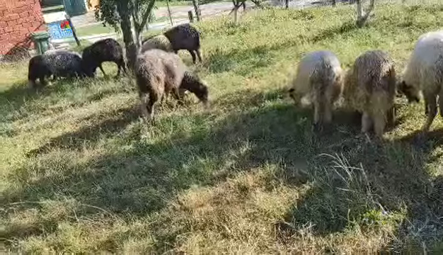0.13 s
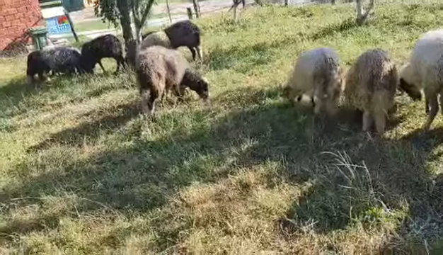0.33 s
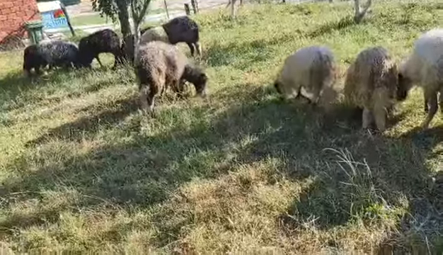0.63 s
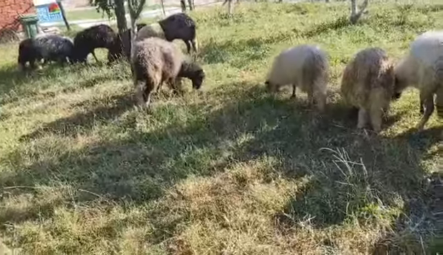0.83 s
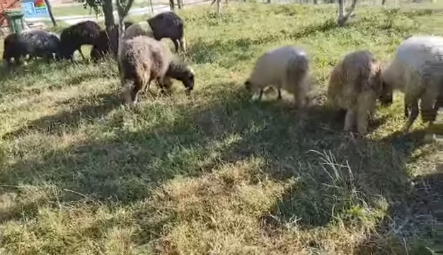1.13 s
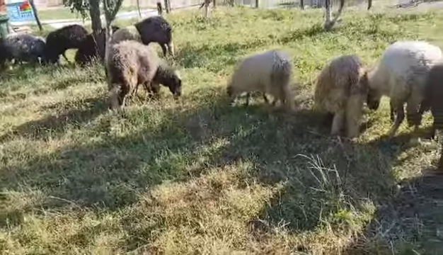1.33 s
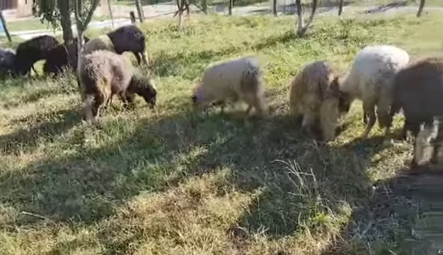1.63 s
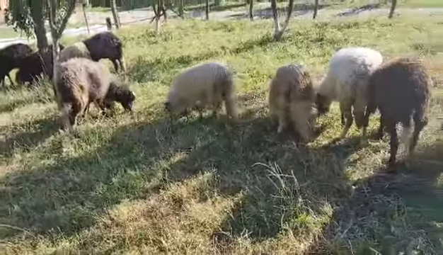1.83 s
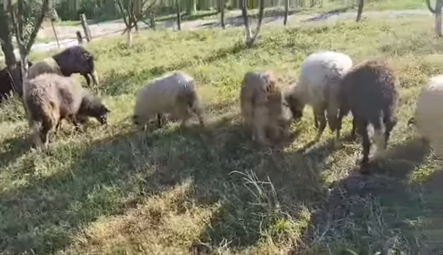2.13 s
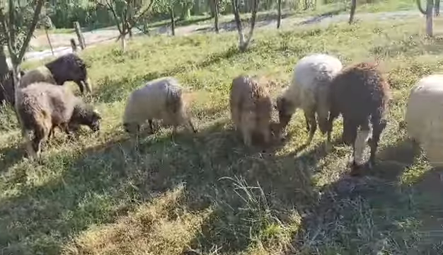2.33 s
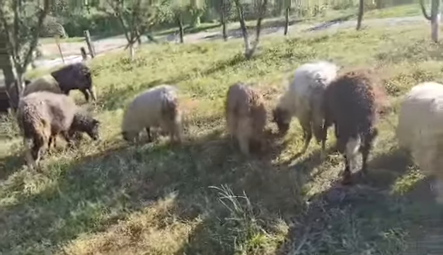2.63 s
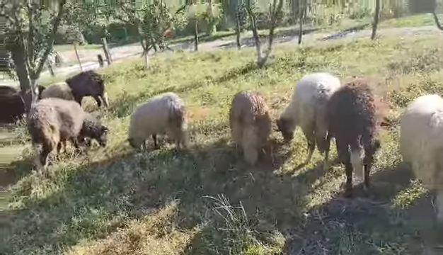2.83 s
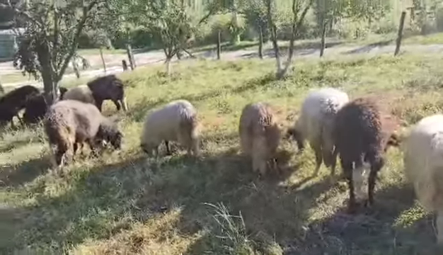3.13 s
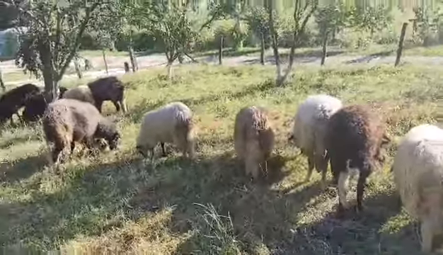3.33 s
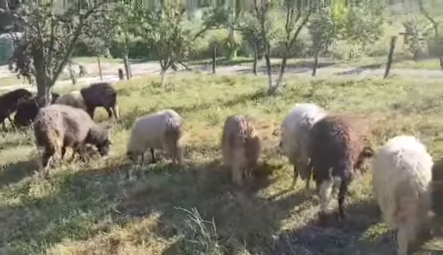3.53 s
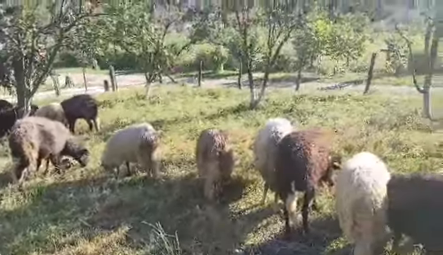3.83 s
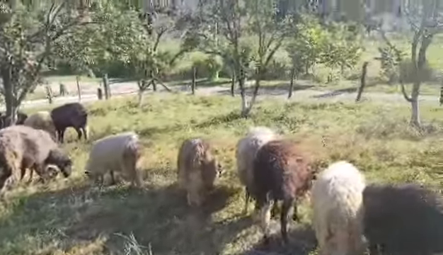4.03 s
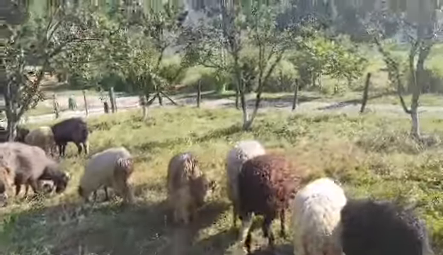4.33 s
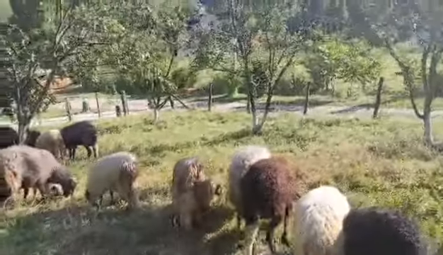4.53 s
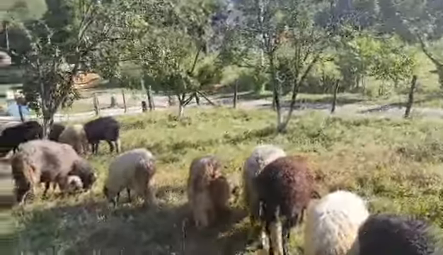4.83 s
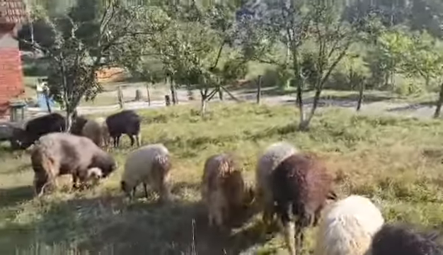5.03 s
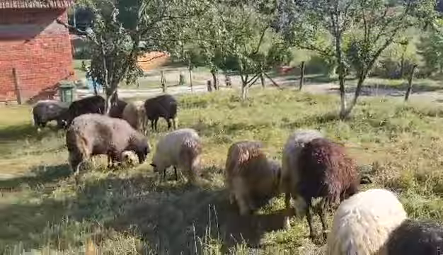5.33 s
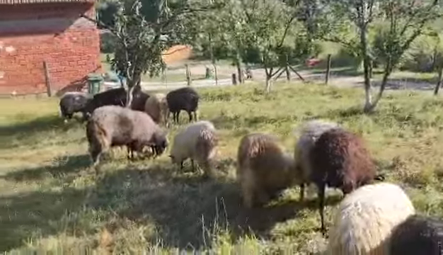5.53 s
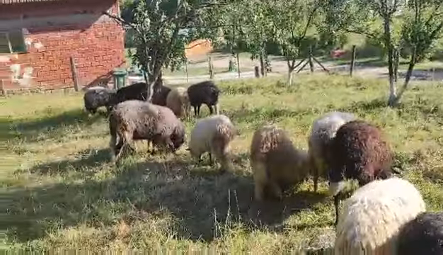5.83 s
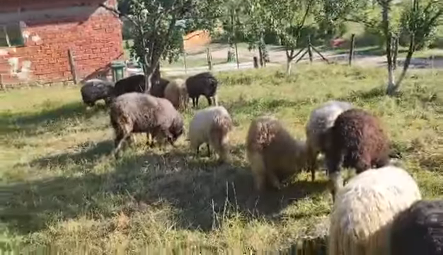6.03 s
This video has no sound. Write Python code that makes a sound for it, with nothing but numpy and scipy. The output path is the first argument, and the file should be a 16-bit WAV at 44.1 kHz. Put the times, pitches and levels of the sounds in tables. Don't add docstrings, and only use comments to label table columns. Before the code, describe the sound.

Grazing sheep crop grass with crackling rustle as one dull, clanky neck bell jolts unevenly outdoors and gusts buffet the left channel.

```python
import sys
import numpy as np
from scipy import signal
from scipy.fft import rfft, irfft
from scipy.io import wavfile
from scipy.ndimage import uniform_filter1d, minimum_filter1d

SR = 44100
rng = np.random.default_rng(int(sys.argv[2]) if len(sys.argv) > 2 else 0)


def natural_amplitude(level_db):
    exponent = np.asarray(level_db, float) / 20
    return 10 ** exponent


def put_to_file(sound):
    columns = np.atleast_2d(sound).T
    safe = np.clip(columns, -1, 1)
    whole_steps = np.round(safe * 32767)
    wavfile.write(sys.argv[1], SR, whole_steps.astype(np.int16))


N = 272008
TIME = np.arange(N) / SR

# start_s, level_db
GRAZING = [(0.3, -55.5), (1.34, -54.5), (1.53, -53.5), (1.98, -55.5), (2.21, -54.5), (2.8, -49),
           (3.03, -56.5), (3.31, -54.5), (3.52, -47), (3.85, -53.5), (4.14, -46.5), (4.27, -48),
           (5.25, -47), (5.63, -46), (6.17, -54.5)]
# centre_s, half_length_s, level_db
TEARS = [(3.3, 0.018, 3.5), (1.851, 0.024, 9), (4.9, 0.02, 6), (4.5, 0.042, 4.5), (2.8, 0.019, 6),
         (6.6, 0.11, 3), (3.4, 0.058, 7.5), (5.4, 0.058, 2.5), (7, 0.07, 3), (2.3, .08, -3),
         (2.7, 0.057, 3), (5.6, 0.023, 2.5), (0.88, 0.05, 4), (5.46, 0.013, -2.5)]
# start_s, peak_db, bright_part_db
SNAPS = [(0.178, -49, -59), (0.76, -45, -63), (0.975, -37.5, -53), (1.0767, -37, -52), (1.088, -57, -38.5),
         (1.0964, -42, -43), (1.1012, -43, -36), (1.1027, -41.5, -43), (1.2066, -43.5, -57),
         (1.229, -55, -37), (1.5539, -60, -59), (1.8765, -45.5, -33.5), (2.1721, -55, -36),
         (2.4151, -68, -52), (0.6835, -55, -57), (5.2766, -44, -52), (5.478, -53, -28.5), (5.36, -39, -55),
         (3.429, -34, -59), (4.892, -50, -28), (5.979, -50, -34.5), (2.7397, -39.5, -48),
         (2.8257, -38, -56), (2.858, -44, -58), (3.017, -41.5, -41), (3.4976, -49, -29), (3.5102, -32, -24),
         (3.524, -25.5, -28.5), (3.532, -30, -56), (3.5443, -28, -47), (3.5509, -37, -63),
         (5.196, -36.5, -36), (5.2438, -52, -36), (5.4625, -58, -30.5), (5.6778, -36.5, -30.5)]
# pitch_hz, level_db
LEFT_DULL = [(60, -6.5), (250, 0), (700, -2), (1100, -2.5), (2200, 0.5), (3200, -3), (4500, -5), (5600, -8),
             (7000, -21)]
RIGHT_DULL = [(60, -8.5), (200, -1), (600, -6), (1000, -2.5), (2200, -7.5), (3500, -4), (4800, -10),
              (7000, -2)]
LEFT_BRIGHT = [(4500, -18.5), (6000, -11), (7200, -12.5), (8300, 2), (9500, -4), (10500, -13), (12500, -13),
               (13300, -20.5)]
RIGHT_BRIGHT = [(3800, -13.5), (5000, -7.5), (6200, -11), (7500, 1.5), (8600, -9), (9500, -13),
                (10500, -15), (12800, -14.5), (13300, -47)]

MODE_HZ = [1019, 1130, 2637, 2865, 5179, 7461, 7792, 8984, 9334, 9812, 4912, 10304, 10753]
# level_db, t60_s, rise_ms, left_minus_right_db, left_lead_rad
MODES = [(8, 0.084, 3, 6, 0.46), (0, 0.91, 0.77, 7.5, 0.6), (2.5, 1.04, 2.1, 1, -0.56),
         (5, 0.8, 9.5, 4, -0.5), (3, 0.4, 0.2, -0.5, 3), (2.5, 0.28, 0.2, -3.5, 3),
         (7, 0.29, 0.048, -5.5, -0.5), (1, 0.2, 0.85, 18.5, 5.5), (0.5, 0.25, 0.34, 6, 0.9),
         (3.5, 0.15, 0.21, 10, 6.5), (4.5, 0.41, 0.26, 3, -1.2), (17.5, 0.15, 0.39, 12, -1),
         (9, 0.11, 0.37, 24, -1)]
# readiness_db, crest_round_deg, crest_up_deg
SHAPES = [(-2, 30, 39.5), (-8, 2, 2), (-10, 77, 6), (-17, 92, 144.5), (-14, 93.5, 66), (-8, 28.5, 145.5),
          (-11, 94, -15), (-6, 136, 43), (-12, 114, 59), (-15, 174, 124), (-17, 129.5, -12.5),
          (-30, 95, 114), (-25.5, 91, 54)]
WAVES_ROUND = [3, 0, 1, 3, 3, 2, 2, 4, 1, 1, 4, 3, 4]
WAVES_UP = [4, 0, 2, 4, 3, 2, 0, 1, 4, 4, 1, 4, 2]
TWIN = [0, 0, 1, -1, -1, 1, -1, 1, -1, 1, 1, -1, 1]
WAIST = [0, 0, 0, 0, 1, 0, 0, 0, 0, 0, 1, 0, 0]
# left_minus_right_facing_away_db, change_per_head_turn_db
BEAMS = [(-0.5, 1), (1, 1), (11, -2.5), (6.5, -1.5), (-2.5, -1.5), (-3.5, -6.5), (2.5, -8.5), (3, -42),
         (2.5, 5), (8, 1), (1, 3.5), (-12, 2), (13, 4)]
# start_s, turn (+ to one side)
HEAD_TURNS = [(0.07, 0.026), (0.39, -1.1), (0.83, 0.16), (2.02, 0.51), (2.3, 0.25), (3.33, 1.2),
              (3.8, -0.72), (4.4, -1.4), (4.9, 2), (5.5, -0.82), (5.8, 0.32), (6.03, -0.79)]
# start_s, lead_ms
BEARING = [(.3, 0.34), (.9, 0.45), (1.3, 0.48), (1.7, 0.31), (2.05, 0.2), (2.5, .15), (3.35, 0.19),
           (3.7, 0.12), (4.15, 0.041), (4.6, 0.063), (5.5, 0.12), (6.05, .18)]
# start_s, strength_db, round_rim_deg, up_wall_deg, hum_left_by_wool_db
BLOWS = [(0.0723, -35.5, 97, 150, 4), (0.3811, -20.5, 52, 132, -24), (0.8079, -31, 42, 29, -9),
         (1.2584, -29.5, 90.7, 16.5, -16), (1.5726, -30.5, 107, 16, -36), (1.7122, -33, 142, 85.6, -29),
         (1.94, -23, 171, 41.4, -39), (2.0169, -19, 96, 8.2, -20), (2.4676, -27, 94, 81, -3.5),
         (3.3256, -27.5, 91.5, 140.5, -5), (3.4132, -23.5, 93, 147, -28), (3.6283, -22.5, 148, 40.6, -15),
         (3.809, -28, 65, 40.8, -19), (4.117, -23.5, 2.2, 46, -18), (4.216, -23.5, 7.1, 168.0, -4.5),
         (4.3322, -23.5, 26, 65.2, -9), (4.5875, -30, 114.3, 140.0, -65), (4.8269, -23, 2.4, 90, -39),
         (5.1732, -29, 86, 55.6, -15), (5.491, -18, 7, 112, -13), (5.795, -16.5, 9.5, 20.0, -2.5),
         (6.0292, -15, 4.6, 126.3, -13.5)]
REBOUNDS = [(0.1217, -30.5, 174, 37, -5.5), (0.402, -30.5, 75, 176.0, -5), (0.829, -27.5, 30, 176.0, -27),
            (0.863, -28, 131, 84, -17), (2.089, -27, 18.7, 43.7, -15), (2.536, -30.5, 90, 108, -5.5),
            (3.481, -25, 12, 40.6, -17), (4.7, -40.5, 28, 370, 0), (5.507, -25.5, 71, 65, -31.0),
            (2.027, -22.5, 95, 9.8, -19), (3.337, -28, 98, 140.5, -9), (3.49, -24, 20, 38.4, -17),
            (3.822, -33, 51, 37, -23.5), (3.832, -29, 65.4, 39.2, -18), (4.352, -25, 7.1, 165, -7),
            (5.8064, -19.5, 16, 31, -6), (5.498, -20.5, 7.3, 111, -8.5)]
# start_s, clank_peak_db, hardness_db_per_octave, lean_to_twin_db, waist_db
CLANKS = [(0.3767, -38.5, 3, -1.6, 2), (0.8057, -42, -1.7, -3.5, -1.5), (0.832, -44, -3, 0.3, -0.7),
          (1.256, -44, -3.5, 1.3, 0.8), (1.5703, -48, -0.5, 0.1, 1.5), (1.708, -64, -1.8, 2.5, -7),
          (1.9378, -40, 1.7, -0.9, -3.5), (2.0146, -31.5, -4.5, 2, -2), (2.0264, -53, 0.3, 1.3, -1),
          (2.089, -46, -0.2, 0.3, 2), (2.4658, -42, -2.2, 2.8, -4), (3.3219, -37.5, 2, -1.5, 4.2),
          (3.411, -53, 2, 1.5, 0.1), (3.478, -51, -0.4, -1.5, 0.1), (3.6244, -56, -4.5, 0, -5),
          (3.8064, -60, -7.7, 5, -4.5), (3.8304, -59, -1, -0.2, 1.3), (4.114, -44, -2.3, -0.2, 3.2),
          (4.215, -42, 1, -0.7, -1), (4.3286, -59, -1.2, -1, -3), (4.5845, -68, 3, 1.2, -4),
          (4.8229, -43, -1.3, 2.5, 5), (5.1722, -42, 0.5, 0.8, -2), (5.4914, -49, 0.8, 0.3, 0.5),
          (5.7932, -45, 0.5, -2, -3), (5.806, -43, 0.3, 2.1, 3), (6.027, -35, 5.1, -2.2, -1.5)]
# start_s, peak_db, left_minus_right_db
SHEEN = [(0.1201, -59.5, 5), (0.393, -41, -1), (0.8134, -60, 3.5), (1.2564, -78, 0.0), (1.5744, -68, -2.0),
         (1.7074, -63, 0.5), (1.9375, -46, -11), (2.0153, -50.5, 30), (2.0742, -48, 14),
         (2.4638, -63, -2.5), (3.3354, -74, 4.0), (3.4114, -55, -3), (3.4807, -41, 4), (3.4945, -38, 9),
         (3.6247, -45, 13), (3.8067, -41, 5), (3.8307, -43, 10.5), (4.114, -49, 17), (4.2193, -41, -1),
         (4.3415, -49, 1.5), (4.8264, -54, -0.5), (4.8898, -60, 2.5), (5.4874, -43, 23), (5.5074, -49, 8),
         (5.8067, -29.5, 3), (6.027, -50, 24), (6.0494, -57, 1)]
# delay_s, and level_db
ECHO_S = (.044, .057, 0.074)
ECHO_DB = (-13.5, -26.5, -22.5)

# start_s, level_db
BREEZE = [(0.12, -69), (0.5, -60.5), (1.1, -83.5), (2.1, -75), (2.83, -40.5), (3.12, -58), (3.7, -50.5),
          (4.05, -34), (4.33, -41), (4.62, -62.5), (4.9, -63), (5.1, -36), (5.3, -32), (5.44, -60),
          (5.62, -38.5), (5.85, -60), (6.17, -69)]
# centre_s, half_length_s, level_db
GUSTS = [(0.466, 0.034, -58), (0.7, 0.084, -52), (1.344, 0.029, -50), (1.494, 0.022, -51.5),
         (2.28, 0.062, -49.5), (2.706, 0.05, -34), (2.918, 0.032, -30.5), (3.199, 0.016, -26.5),
         (3.326, 0.0092, -33), (3.79, 0.0093, -27), (3.862, 0.013, -27.5), (3.965, 0.016, -19.5),
         (4.192, 0.068, -30.5), (4.39, 0.058, -35.5), (4.539, 0.02, -36), (4.74, 0.017, -61),
         (3.016, 0.033, -46), (2.62, 0.03, -64), (0.925, 0.027, -54.5), (5.037, 0.052, -26.5),
         (5.17, 0.062, -33.5), (5.38, 0.028, -27.5), (5.518, 0.029, -28.5), (5.612, 0.0093, -23.5),
         (5.679, 0.059, -27.5), (5.916, 0.017, -38.5)]
# start_s, peak_db
PUFFS = [(0.179, -39), (2.695, -28.5), (2.901, -25.5), (3.181, -33), (3.319, -32.5), (3.784, -34.5),
         (3.958, -16.5), (4.18, -21), (4.349, -38), (4.996, -25), (5.15, -22), (5.178, -19.5), (5.346, -33),
         (5.376, -13.5), (5.485, -19.5), (5.595, -14.5), (5.7, -22)]
# level_at_reference_wind_db, share_of_swing, smoothing_s
EDDIES = [(-43.5, 0.61, 0.15), (-50.5, 1.104, 0.011), (-60, 1.046, .005)]
# pitch_hz, level_against_mean_treble_db
KEPT_ABOVE = [(500, -40), (1200, -16), (2700, -12), (3600, 1), (4400, 3), (5600, 0), (7600, -12),
              (9500, -10), (11000, -2)]


def rms_one(x):
    return x / np.sqrt(np.mean(x ** 2) + 1e-20)


def in_time(rows):
    s, *columns = np.transpose(rows)
    return [np.interp(TIME, s, c) for c in columns]


def bumps(rows):
    return [np.exp(-((TIME - s) / half) ** 2) for s, half, _ in rows]


def band(x, low_hz, high_hz, order=2):
    return signal.sosfilt(signal.butter(order, [low_hz, high_hz], "band", fs=SR, output="sos"), x)


def low_pass(order, cutoff_hz):
    return signal.butter(order, cutoff_hz, fs=SR, output="sos")


def die_away(x, seconds):
    return signal.lfilter([1], [1, -np.exp(-1 / (seconds * SR))], x)


def colour(x, points):
    hz = np.linspace(1, SR / 2, 1025)
    at, db = np.transpose(points)
    level_db = np.interp(np.log(hz), np.log(at), db, left=db[0] - 20.0, right=-80)
    cepstrum = irfft(np.log(natural_amplitude(level_db)))
    cepstrum[1:1024] *= 2
    cepstrum[1025:] = 0
    return signal.oaconvolve(x, irfft(np.exp(rfft(cepstrum)))[:512])[:N]


def ports(x, left, right):
    return np.array([colour(x[0], left), colour(x[1], right)])


def drift(rate):
    r = np.exp(-80 * np.pi * rate / SR)
    slow = signal.lfilter([1], [1, -2 * r, r * r], rng.standard_normal(N // 40 + 2002))[2000:]
    return np.interp(np.arange(N) / 40, np.arange(len(slow)), rms_one(slow))


def clicks(times, sizes):
    out = np.zeros(N)
    out[(np.asarray(times) * SR).astype(int)] = sizes
    return out


def crackle(per_s, size_db, hiss, shared):
    draw = rng.random((3, N)) * SR / (per_s * natural_amplitude(3.0 * drift(18.0)))
    noise = rng.standard_normal((3, N))
    sizes = np.clip(draw, .007, 1) ** (-size_db * np.log(10) / 20)
    breaks = np.where(draw < 1, np.sign(noise) * sizes, 0)
    grains = rms_one(breaks) + hiss * noise[::-1]
    left_lag = 8
    return grains[:2] + shared * np.array([np.roll(grains[2], left_lag), grains[2]])


def grass():
    dull_level_db, dull_follow, effort_ref_db = -59, 0.88, -51.5
    flicker_db, flicker_rate = 1.1, 14
    tear_db = sum(row[2] * bump for row, bump in zip(TEARS, bumps(TEARS)))
    effort_db, = in_time(GRAZING)
    bright_db = effort_db + tear_db
    dull_db = dull_level_db + dull_follow * (effort_db - effort_ref_db) + .6 * tear_db
    bright = rms_one(ports(crackle(2700.0, 3.2, 0.56, 0.35), LEFT_BRIGHT, RIGHT_BRIGHT))
    bright *= natural_amplitude(bright_db + 2.0 + flicker_db * drift(flicker_rate))
    dull = rms_one(ports(crackle(1200.0, 2.18, 0.31, 0.62), LEFT_DULL, RIGHT_DULL))
    dull *= natural_amplitude(dull_db + 9.0 + flicker_db * drift(flicker_rate))
    return bright + dull


def snaps_and_clanks():
    clank_db, clank_top_db, clank_early_s, snap_s = 3.5, -3.5, 0.00023, .002
    ticks = [(s - clank_early_s, db + clank_db, db + clank_top_db) for s, db, *_ in CLANKS]
    s, peak_db, top_db = np.transpose(list(SNAPS) + ticks)
    noise = rng.standard_normal((3, N))
    noise = noise[:2] * 1.51 + noise[2]
    low = die_away(clicks(s, natural_amplitude(peak_db + 3.0)), snap_s) * noise
    top = die_away(clicks(s, natural_amplitude(top_db + 6.0)), snap_s) * noise
    return band(low, 1300, 6250) + ports(top, LEFT_BRIGHT, RIGHT_BRIGHT)


def strikes():
    node_leak, hum_hz, hard_from_hz = .003, 1130, 4600
    carry_db = -9.5
    mode_hz, t60 = np.array(MODE_HZ), np.array(MODES)[:, 1]
    s, db, round_deg, up_deg, hum_db = np.array(sorted(list(BLOWS) + list(REBOUNDS))).T[:, :, None]
    ready_db, crest_round, crest_up = np.transpose(SHAPES)
    round_share = np.cos(np.radians(np.array(WAVES_ROUND) * round_deg - crest_round)) ** 2 + node_leak
    up_share = np.cos(np.radians(np.array(WAVES_UP) * up_deg - crest_up)) ** 2 + node_leak
    at, _, hardness, lean_db, waist_db = np.transpose(CLANKS)
    hard_db = np.interp(s, at, hardness) * np.log2(np.maximum(mode_hz / hard_from_hz, 1))
    hard_db += np.interp(s, at, lean_db) * np.array(TWIN)
    hard_db += np.interp(s, at, waist_db) * np.array(WAIST)
    blow_db = db + hard_db + ready_db + hum_db * (mode_hz == hum_hz)
    power = round_share * up_share * natural_amplitude(blow_db) ** 2
    for k in range(1, len(s)):
        power[k] += power[k - 1] * natural_amplitude(carry_db - 60 * (s[k] - s[k - 1]) / t60) ** 2
    return s[:, 0], 10 * np.log10(power)


def bell(early_s=0.001, flutter_db=3.0, burst=0.42, burst_s=0.01):
    times, levels_db = strikes()
    times = times - early_s
    head_turn = np.interp(times, *np.transpose(HEAD_TURNS))
    last = np.maximum(np.searchsorted(times, TIME) - 1, 0)
    age = TIME - times[last]
    swings = [natural_amplitude(flutter_db * drift(35.0)) for _ in range(4)]
    first = 1 + burst * np.exp(-age / burst_s)
    left_lead_s = in_time(BEARING)[0] / 1000
    out = np.zeros((2, N))
    for k, (db, t60, rise_ms, pan_db, lead) in enumerate(MODES):
        beam_db = pan_db + BEAMS[k][0] + BEAMS[k][1] * head_turn
        sides_db = np.minimum([beam_db, -beam_db], 0)
        start = natural_amplitude(levels_db[:, k] + db + sides_db)[:, last]
        fall = np.exp(-np.log(1000) * age / t60) * (age > 0)
        if k > 1:
            fall = fall * first * swings[k % 4]
        smooth = np.exp(-1000 / (rise_ms * SR))
        shape = signal.lfilter([1 - smooth], [1, -smooth], start * fall)
        phase = 2 * np.pi * MODE_HZ[k] * TIME
        left_phase = phase + lead + 2 * np.pi * MODE_HZ[k] * left_lead_s
        out += shape * np.sin([left_phase, phase])
    return out


def clack(jangle_db=-12.0, jangle_s=0.047, spark_db=-6.0, spark_s=0.0096, knock_db=0.5):
    times, levels_db = strikes()
    high_modes = np.array(MODE_HZ) > 7000
    hits = clicks(times - .002, natural_amplitude(np.max(levels_db[:, high_modes], axis=1)))
    noise = rng.standard_normal((2, N))
    jangle = natural_amplitude(jangle_db) * die_away(hits, jangle_s) * noise
    spark = natural_amplitude(spark_db) * die_away(hits, spark_s) * noise
    both = band(jangle, 6900, 11600) + natural_amplitude(knock_db) * band(spark, 2700, 6300)
    return both * natural_amplitude([[3.5], [-3.5]])


def wall(x):
    dull = signal.sosfilt(low_pass(2, 1960), x)
    return sum(natural_amplitude(db) * np.pad(dull, ((0, 0), (int(s * SR), 0)))[:, :N] for s, db in zip(ECHO_S, ECHO_DB))


def sheen(level_db=-3.5, t60_s=0.17, flash_s=0.0018, tail_db=-6.5):
    s, db, pan_db = np.transpose(SHEEN)
    hits = np.array([clicks(s, natural_amplitude(db + level_db + side * pan_db / 2)) for side in (1, -1)])
    tail = signal.lfilter([natural_amplitude(tail_db)], [1, -natural_amplitude(-60 / (t60_s * SR))], hits)
    flash = die_away(hits, flash_s)
    noise = rng.standard_normal((2, 2, N))
    clusters = natural_amplitude(-10.0) * band(noise[0], 11850, 12100)
    clusters += natural_amplitude(1.0) * band(noise[1], 12220, 12400)
    clusters += band(noise[0], 12740, 12920)
    return tail * rms_one(clusters) + flash * rms_one(band(noise[1], 11600, 13500, order=4))


def wind():
    wind_ref_db = -49.5
    port_top = 0.51
    edges_hz, leak_db = [(16, 56.6), (70, 194), (190, 295)], [-20.0, -27.0, -30.0]
    out = np.zeros((2, N))
    lumps = drift(27.5)
    force = natural_amplitude(in_time(BREEZE)[0])
    force = force + sum(natural_amplitude(row[2]) * bump for row, bump in zip(GUSTS, bumps(GUSTS)))
    force_db = 20 * np.log10(force) - wind_ref_db
    for (level_db, follow, smooth_s), (low_hz, high_hz), db in zip(EDDIES, edges_hz, leak_db):
        eddies = rms_one(band(rng.standard_normal((2, N)) * natural_amplitude(3.84 * lumps), low_hz, high_hz))
        swing_db = follow * uniform_filter1d(force_db, int(smooth_s * SR) + 1)
        out += eddies * natural_amplitude(level_db + swing_db + 5.5) * natural_amplitude([[0], [db]])
    s, peak_db = np.transpose(PUFFS)
    push = clicks(s, natural_amplitude(peak_db + 43.0) * rng.choice([-1, 1], len(s)))
    out[0] += band(push, 63, 440)
    squashed = port_top * np.tanh(out / port_top)
    return signal.sosfilt(low_pass(3, 400.0), squashed) * (TIME > BREEZE[0][0])


def lurch(start_s=0.2, rise_s=0.08, fall_s=0.17, level_db=-17.5):
    age = np.maximum(TIME - start_s, 0)
    swing = (1 - np.exp(-age / rise_s)) * np.exp(-age / fall_s)
    back = 0.22 * (1 - np.exp(-age / 0.23)) * np.exp(-age / 0.56)
    return (swing - back) * natural_amplitude(level_db) * natural_amplitude([[0], [-4.6]])


def scene():
    ringing = bell() + clack() + sheen()
    return grass() + snaps_and_clanks() + ringing + wall(ringing) + wind() + lurch()


def thin_out(x, size=2048):
    follow, ref_db, step_db, wind_cost_db = .6, -80.0, 5, -29
    window = np.sin(np.pi * (np.arange(size) + .5) / size)
    hz, _, bins = signal.stft(x, SR, window, size)
    level_db = 20 * np.log10(abs(bins) + 1e-12)
    treble = np.mean(abs(bins[:, (hz > 1000) & (hz < 13000)]) ** 2, axis=(0, 1))
    rumble = np.mean(abs(bins[0, (hz > 40) & (hz < 500)]) ** 2, axis=0)
    gusts = natural_amplitude(wind_cost_db) ** 2 * rumble
    mean_db = 10 * np.log10(treble + gusts + 1e-24)
    at, db = np.transpose(KEPT_ABOVE)
    line_db = np.interp(np.log(hz + 1), np.log(at), db)[:, None] + ref_db + follow * (mean_db - ref_db)
    steps = rng.standard_normal((1, size // 24 + 1, bins.shape[2]))
    steps = uniform_filter1d(steps, size=3, axis=2) * np.sqrt(3)
    patches = step_db * np.repeat(steps, 12, axis=1)[:, :len(hz)]
    return signal.istft(bins * (level_db > line_db + patches), SR, window, size)[1][:, :N]


def hush(x, hush_db=-12.0, ahead_s=.012, jump_db=12, from_hz=3000):
    low = signal.sosfiltfilt(low_pass(3, from_hz), x)
    treble = x - low
    level_db = 10 * np.log10(uniform_filter1d(np.mean(treble ** 2, axis=0), size=132) + 1e-12)
    ahead = int(ahead_s * SR)
    coming_db = -minimum_filter1d(-level_db, size=ahead, origin=-(ahead // 2))
    starved = uniform_filter1d(1. * (coming_db - level_db > jump_db), size=44)
    return low + treble * natural_amplitude(hush_db * starved)


def band_limit(x):
    return signal.sosfilt(signal.butter(12, 14220, fs=SR, output="sos"), x)


def record(dry):
    start_s, fade_s = 0.073, 0.23
    opened = dry * np.clip((TIME - start_s) / fade_s + 0.4, 0, 1) * (TIME > start_s)
    mix = hush(thin_out(opened))
    return band_limit(mix)


dry = scene()
out = record(dry)
put_to_file(out)
```